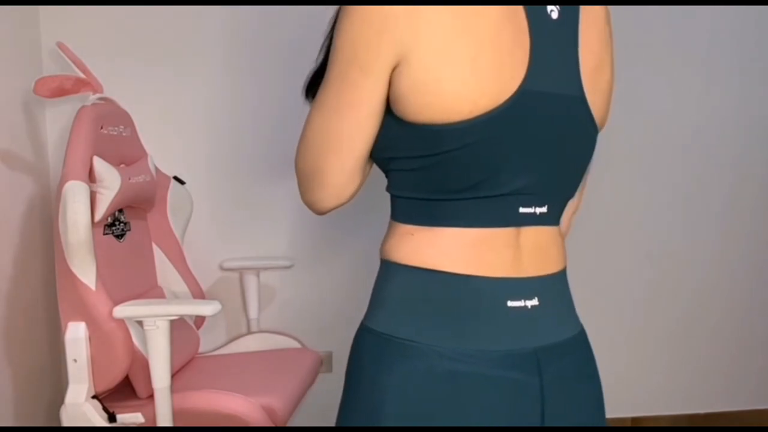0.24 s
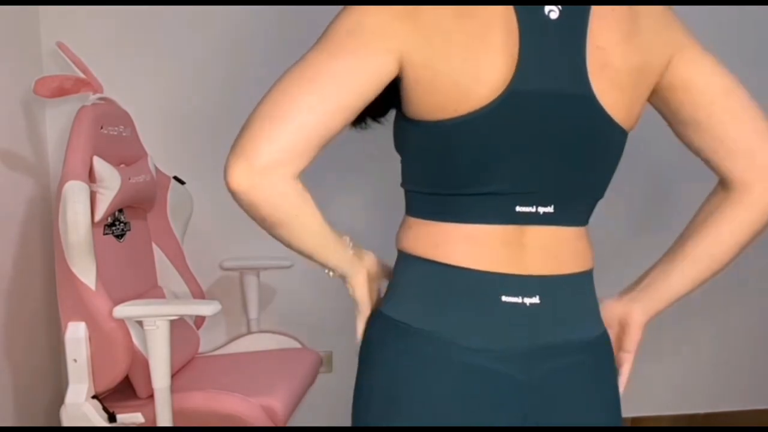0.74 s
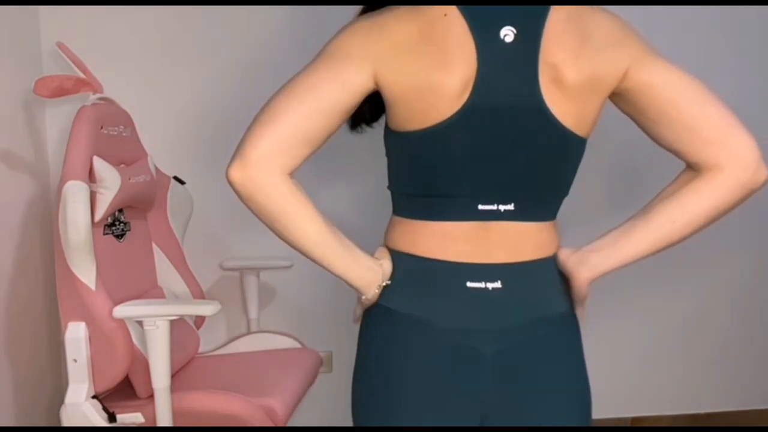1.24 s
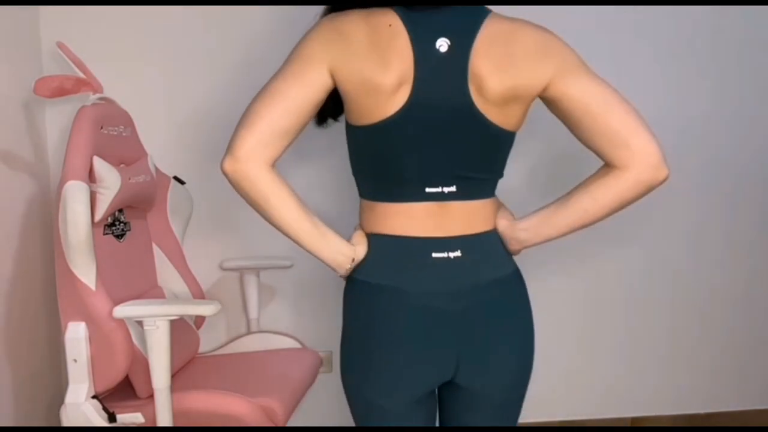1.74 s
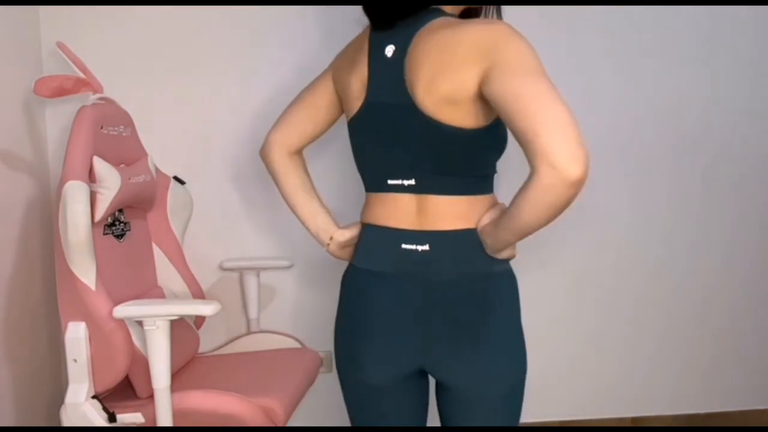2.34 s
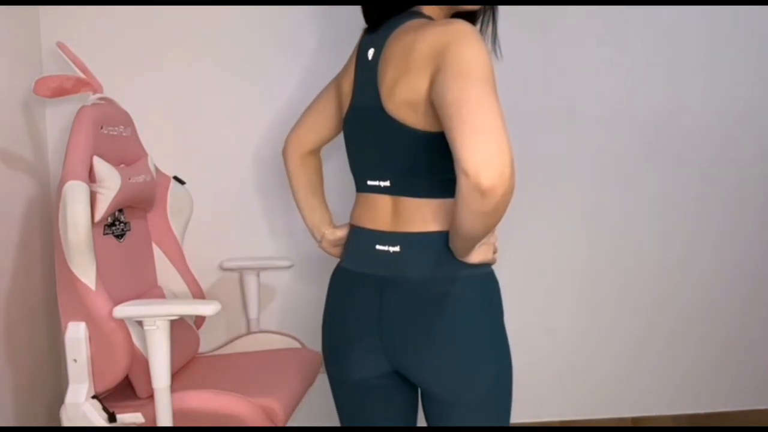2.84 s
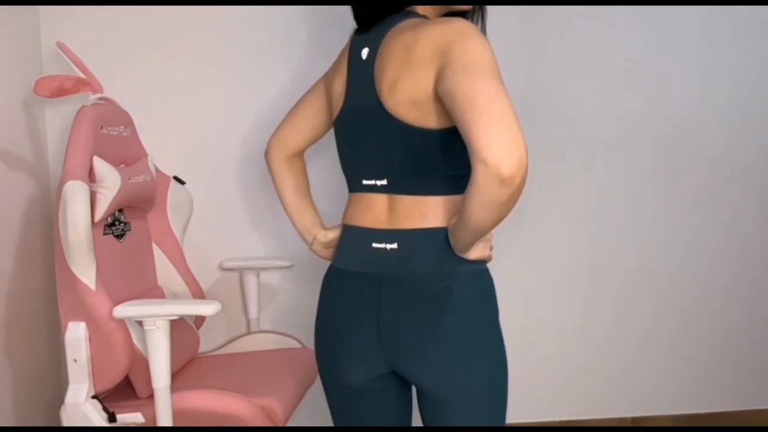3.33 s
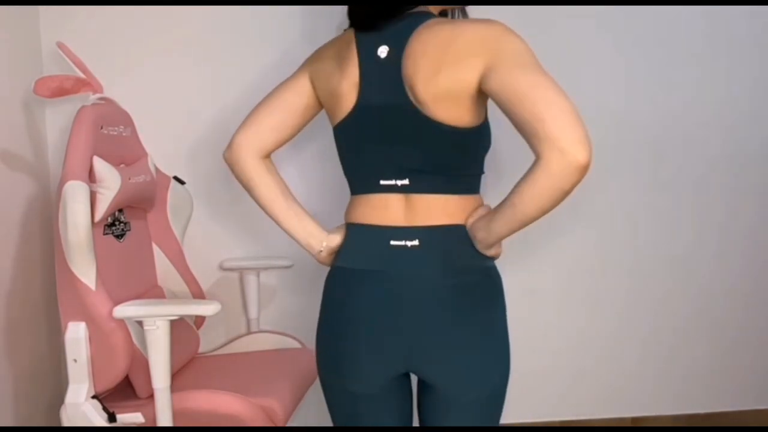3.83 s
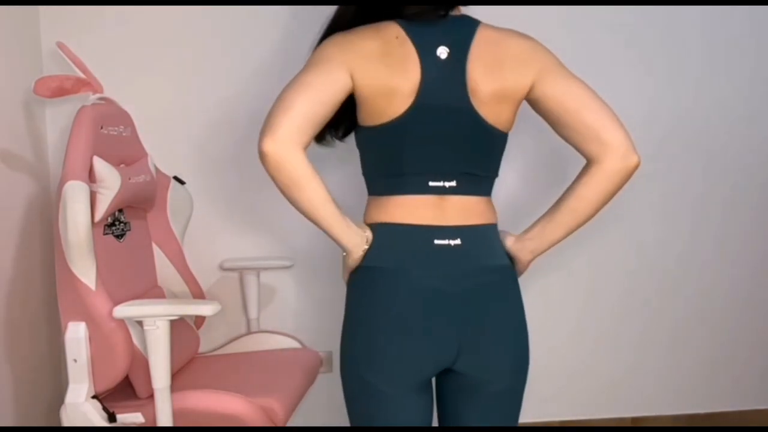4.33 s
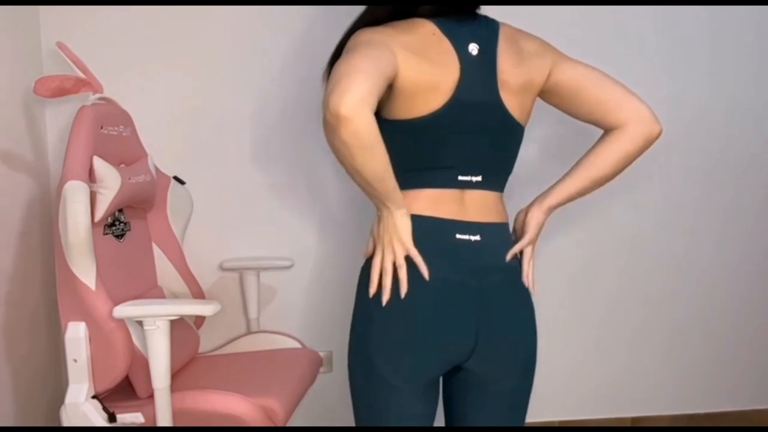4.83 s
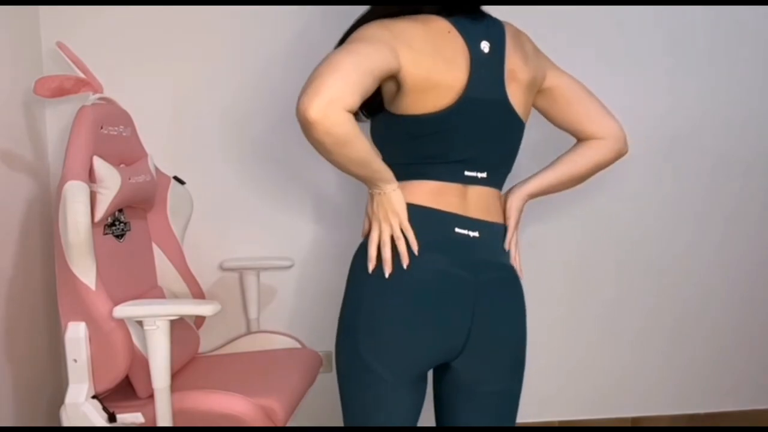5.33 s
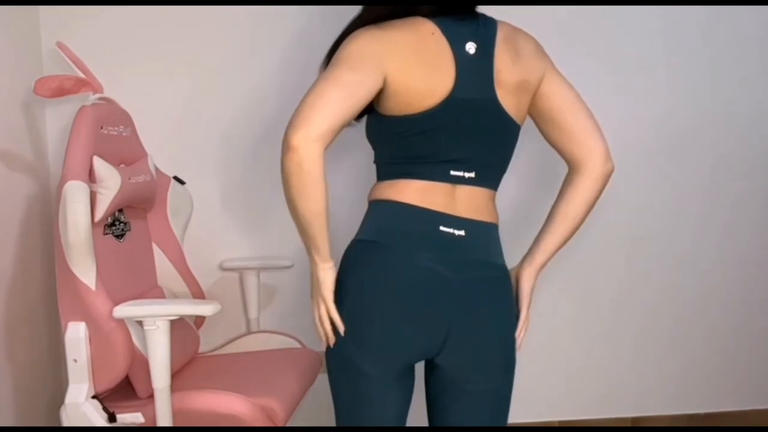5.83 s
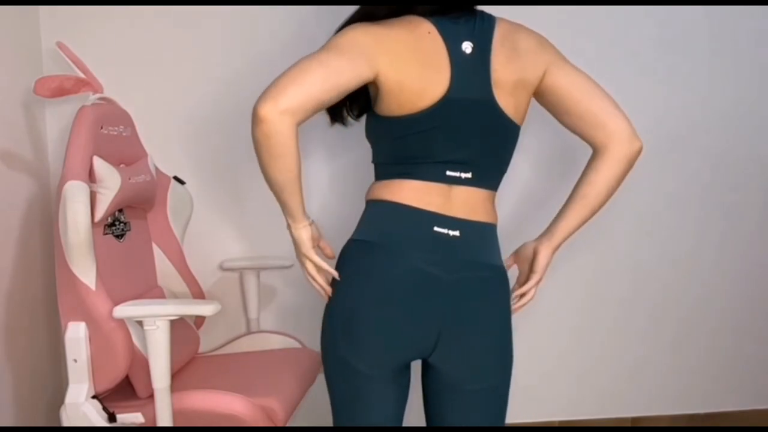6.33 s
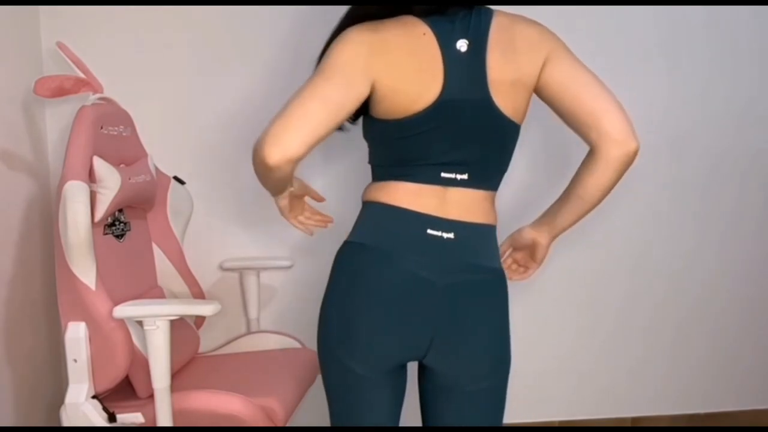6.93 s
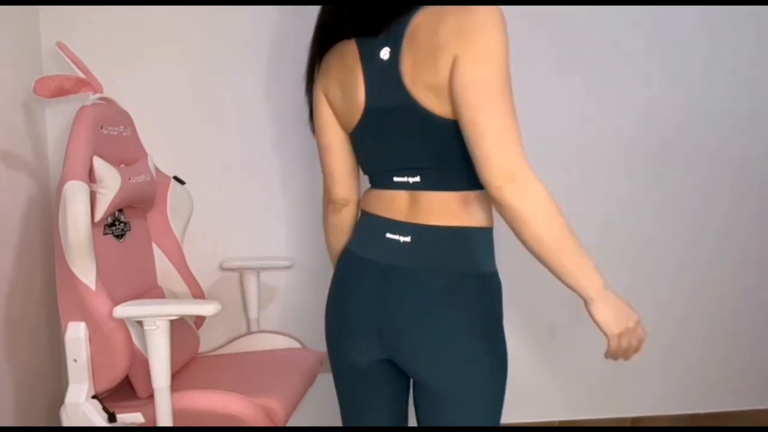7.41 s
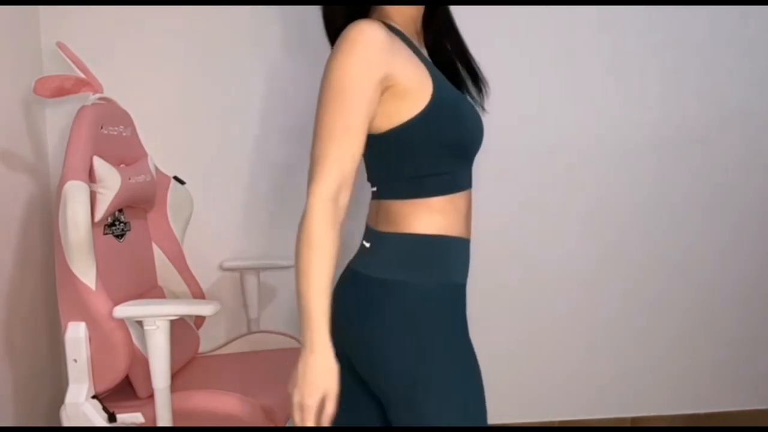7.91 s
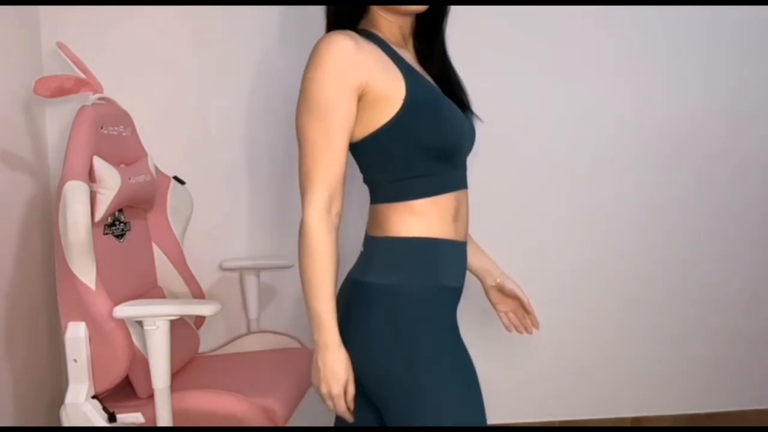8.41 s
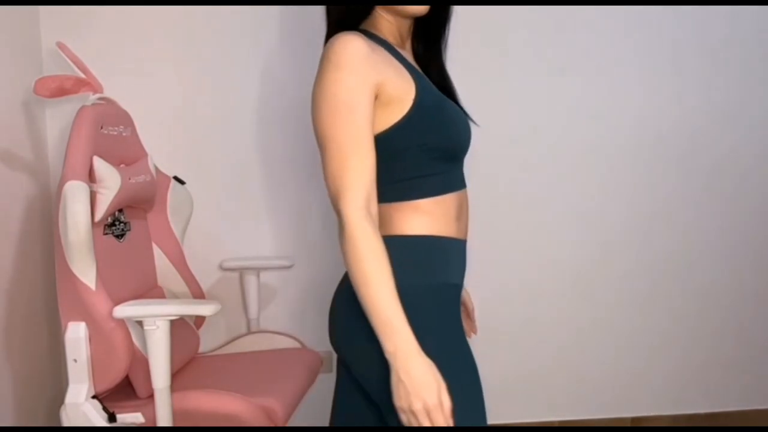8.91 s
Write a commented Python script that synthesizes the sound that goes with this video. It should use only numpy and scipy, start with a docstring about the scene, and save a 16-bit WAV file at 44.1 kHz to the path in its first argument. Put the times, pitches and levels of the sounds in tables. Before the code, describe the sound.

A person shifts and turns in snug sportswear; fabric swishes and scuffs softly while deep bumps jolt a microphone resting on the cloth.

```python
"""Cloth and hands rub with a soft, stuttering hiss of band-passed grains, with swishes, strokes and scuffs.
A person in tight sports clothes shifts and turns in a quiet room, a small microphone resting on the fabric.
At no distance, slips and weight shifts jolt it into thumps, mostly 40-100 Hz: a pull, a swing, a decaying ring.
Pressure spikes give narrow ticks and wider dull knocks, some on top of a jolt; random bumps make a low rumble
carried through the body. Behind lie shuddering tones, grinding low mids, deep sway noise and steady room air."""
import sys
import numpy as np
from scipy import signal
from scipy.fft import rfft, irfft
from scipy.io import wavfile
from scipy.ndimage import uniform_filter1d

SR = 44100
rng = np.random.default_rng(int(sys.argv[2]) if len(sys.argv) > 2 else 0)


def level_to_linear(level):
    """Convert decibel levels to linear amplitude factors, elementwise."""
    exponent = np.asarray(level, float) / 20
    return 10 ** exponent


def output_pcm(signal):
    """Save a mono or channel-first signal as 16-bit PCM at the path in sys.argv[1].

    Samples are clipped to [-1, 1] before scaling.
    """
    pcm = np.clip(np.atleast_2d(signal).T, -1, 1) * 32767
    wavfile.write(sys.argv[1], SR, np.round(pcm).astype(np.int16))


N = 404037   # length in samples, about 9.16 s

# room air and self-noise: f/Hz, density/dB per Hz
ROOM_SPECTRUM = [(20, -60.5), (40, -78), (120, -82), (600, -106), (2000, -110), (8000, -114), (15500, -118)]
# weight shifting, heard as rumble through the body: t/s, low level before a common lift/dB,
# upper rumble relative to the low/dB
WEIGHT_SHIFTS = [(0.0, -73, -3), (0.79, -60, -11.5), (1.25, -51.5, -10), (1.58, -54, 0.5), (1.78, -53, -10),
                 (2.07, -50, -4.5), (2.4, -55, -3), (2.91, -64, 1.5), (3.09, -53.5, -1.5),
                 (3.44, -49.5, -1.5), (3.57, -41.5, -2), (3.85, -58.5, -3.5), (4.44, -53, -3.5),
                 (4.59, -51, -6), (5.23, -47.5, -1.5), (5.54, -52.5, -5), (6.07, -48.5, -4),
                 (6.35, -47.5, -9), (6.53, -48, -15), (6.71, -48.5, -12), (6.97, -56, -2), (7.24, -46, -8),
                 (7.5, -48.5, -6), (7.68, -55, -1), (8.27, -52.5, -8), (8.62, -57, 0), (8.83, -45.5, -8.5),
                 (9.16, -48.5, -5)]
# cloth slipping in quick regular jerks, one list per shudder: t/s, f/Hz, level of the first partial/dB
SHUDDERS = [
    [(4.675, 54, -52), (4.70, 56, -35), (4.73, 88.5, -33), (4.76, 130, -38.5), (4.80, 134, -57)],
    [(6.27, 79, -40), (6.29, 96, -36), (6.315, 69, -38), (6.35, 55, -40)],
    [(6.66, 125, -40), (6.68, 100, -33), (6.70, 83.5, -31.5), (6.735, 64.5, -44)],
    [(7.73, 105, -56), (7.75, 110, -52), (7.77, 107, -41), (7.79, 100, -74)],
]
# jolts of the microphone: t of the end of the pull/s, peak before cushioning/dB, swing/ms,
# starting ring f/Hz, ring t60/s
JOLTS = [(1.058, -31.5, 5.6, 70.0, 0.032), (1.143, -32, 3.3, 90.0, 0.035), (1.4123, -33, 3.9, 38.0, 0.12),
         (2.156, -30, 5.2, 70.0, 0.033), (2.272, -30.5, 4.5, 60.0, 0.027),
         (2.2912, -30.5, 5.1, 95.0, 0.092), (2.4923, -35, 4.6, 85.0, 0.092),
         (2.556, -35.5, 5.7, 60.0, 0.05), (2.7, -37, 2.2, 110, 0.037), (2.768, -35, 4.1, 70, .03),
         (3.273, -28, 5.1, 102.0, 0.054), (3.424, -26.5, 5.8, 60.0, 0.066),
         (3.4621, -24.5, 6.8, 54.0, 0.048), (3.5073, -21.5, 4.6, 38.0, 0.047),
         (3.5332, -20, 3.3, 38.0, 0.076), (3.5798, -25, 3, 48.0, 0.1), (3.627, -28, 7.8, 40.0, 0.087),
         (3.764, -31, 3, 60.0, 0.029), (4.891, -34, 9, 60.0, 0.05), (5.1126, -22, 6.3, 38.0, 0.047),
         (5.1367, -23, 8.7, 50.0, 0.08), (5.1615, -26.5, 7.9, 51.0, 0.16), (5.2965, -31, 6, 43.7, 0.16),
         (6.149, -31, 8, 63.0, 0.22), (6.3706, -18, 0.56, 182, 0.025), (6.376, -25, 3, 110, .034),
         (6.381, -24.5, 7.4, 50, 0.17), (6.516, -24.5, 9.2, 89, 0.041), (6.531, -28.5, 16.5, 38, 0.1),
         (6.8988, -20.5, 9, 60, 0.065), (7.0542, -32, 8.9, 78.0, 0.039), (7.0864, -16.5, 4.9, 42.0, 0.1),
         (7.15, -16, 4.7, 41.5, 0.12), (7.2084, -31, 4.6, 82, 0.054), (7.3018, -17, 4.4, 46.0, 0.082),
         (7.323, -22.5, 10.7, 45.0, 0.038), (7.3596, -23, 3.9, 53.0, 0.22), (7.3693, -15, 0.35, 93, 0.056),
         (8.5976, -34, 10.3, 45.0, 0.12), (8.6638, -23, 9.9, 48.7, 0.044), (8.788, -32, 10, 50.0, 0.045),
         (8.8617, -34.5, 5.9, 70.4, 0.071), (8.881, -37, 7, 60.0, 0.06)]
# resonances of the capsule mount: f/Hz, level/dB, t60/s
MOUNT_MODES = [(513, -5, 0.014), (1500, -1, 0.0024), (2300, 1, 0.0015)]
# narrow ticks, and wider dull knocks, some on top of a jolt: t/s, peak before the mount rings/dB,
# half-width at half height/ms, direction/sign
TAPS = [(1.5824, -39.5, .06, 1), (2.297, -34, 0.37, 1), (3.4622, -29, 0.21, 1), (3.556, -18, 0.92, -1),
        (6.3704, -14, 0.35, 1), (6.3709, -13, 0.36, 1), (6.5215, -20, 0.97, 1), (6.5257, -28.5, 0.096, 1),
        (6.527, -25, 1, 1), (7.3697, -46, .05, 1), (7.153, -26, 0.42, -1), (7.0325, -33, 0.062, -1),
        (7.231, -38, .08, 1), (7.318, -36, .03, 1), (7.3692, -36, 0.23, -1), (6.6635, -46, .1, 1),
        (7.857, -38, 0.21, -1), (7.917, -34.5, 0.46, -1), (7.9502, -40, 0.096, -1), (7.975, -49, 0.18, -1),
        (8.018, -40, 0.074, -1), (8.0508, -30, 0.031, -1), (8.085, -39, 0.11, -1)]
# short scuffs of cloth: t/s, nominal peak/dB, treble relative to the middle before a common lift/dB, centre f/Hz
SCUFFS = [(1.581, -44, -14, 2500), (2.294, -36, -7, 633), (3.333, -36, -11, 2190), (3.457, -31.5, -14, 713),
          (3.53, -29, -22, 560), (5.108, -35, -9, 746), (5.137, -37, -9, 824), (6.523, -43, -9, 1500),
          (6.662, -49, -15, 700), (6.741, -40, -18, 1480), (6.895, -37.5, -4.5, 614), (7.048, -41, -7, 530),
          (7.086, -29.5, -10.5, 501), (7.148, -29, -10.5, 980), (7.202, -38, -8, 1960),
          (7.299, -28, -15, 501), (7.325, -25.5, -17, 829), (7.622, -34, -26, 961),
          (8.664, -31, -10.5, 1500), (8.749, -29, -14, 1500), (8.786, -35.5, -8, 1900),
          (8.82, -35, -8, 2030), (8.852, -42, -2, 1200), (8.877, -39, -4, 703)]
# duller strokes of a palm pressing over the cloth: t/s, rms level at the top/dB, length/ms, centre f/Hz
STROKES = [(0.28, -62.5, 60, 1300), (0.56, -60, 59, 1700), (0.93, -56, 26, 420), (1.17, -55.5, 200, 3540),
           (1.48, -52, 110, 3300), (2.72, -54, 70, 1900), (3.55, -57.5, 110, 600), (4.085, -49, 40, 1860),
           (4.75, -49, 63, 520), (4.89, -48.5, 60, 440), (6.1, -56, 280, 2480), (6.26, -52.5, 70, 2380),
           (7.48, -54.5, 43, 1300)]
# bright swishes of a hand sliding fast: t/s, rms level of the lower band at the top/dB, length/ms
SWISHES = [(0.93, -53, 42), (1.08, -51.5, 23), (1.49, -57, 79), (1.87, -47, 33), (1.96, -46.5, 35),
           (2.045, -49.5, 76), (2.165, -47.5, 52), (3.456, -50, 35), (3.56, -50, 45), (4.25, -49.5, 72),
           (4.45, -48, 49), (4.548, -47, 46), (5.112, -33, 7.6), (5.14, -34, 7), (5.162, -35, 10),
           (5.2, -40.5, 64), (5.3, -46, 90), (5.41, -43, 27), (5.49, -47.5, 65), (5.8, -48.5, 124),
           (6.28, -49, 98), (7.29, -49.5, 41), (7.552, -48, 22), (7.625, -50, 13), (8.15, -48.5, 69),
           (8.244, -55, 25), (8.44, -51, 30), (8.91, -53, 45)]
# bands of cloth noise, all five tables: low f/Hz, high f/Hz, flicker/dB
RUB_BANDS = [(1716, 2170, 1.6), (1890, 2660, 1.2), (2640, 3830, 1.54)]
BRIGHT_BANDS = [(3690, 5550, 1.2), (5910, 8700, 1.3)]
SHEEN_BANDS = [(8040, 16200, 1), (12800, 21500, 0.76)]
DRAG_BANDS = [(177, 400, 1.8), (405, 865, 1.9)]
DULL_BANDS = [(950, 1730, 1)]
# trims, one row per band table in the order above, one entry per band: level/dB
BAND_TRIMS = [
    [-14, -4, -5],
    [-4, -2],
    [2, -2],
    [-4, -4],
    [0.5],
]
# rubbing of cloth and hands: t/s, level before trims and pauses/dB, brightness/dB
RUBBING = [(0.0, -66, 1), (0.66, -64, -1), (1.43, -54.5, 2), (1.71, -60.5, 1), (1.86, -49, -3),
           (1.94, -53, 2), (2.37, -54.5, -3.5), (2.73, -54, -0.5), (2.83, -63, -2.5), (2.88, -56, -3.5),
           (3.54, -51, 0.5), (4.03, -56, -3), (4.08, -49, -3), (4.13, -54.5, -1.5), (4.23, -50.5, 0),
           (4.72, -52, -1), (4.77, -50.5, 0.5), (5.05, -52, 1), (5.2, -49.5, 6.5), (5.25, -53.5, 5),
           (5.31, -48, 3), (5.69, -54.5, 0.5), (6.38, -53, -2.5), (6.48, -65, -3), (6.53, -60, 0),
           (6.55, -78, 5), (6.71, -58.5, -5), (6.86, -62.5, -1.5), (7.32, -60, 2.5), (7.35, -49, -2),
           (7.37, -54.5, 5), (7.4, -55, -1.5), (7.65, -56, -0.5), (7.93, -63, 1), (8.04, -54, -0.5),
           (8.24, -52, 0), (8.54, -58, -1), (8.88, -54.5, -5.5), (9.11, -57, 2.5), (9.16, -70, -4)]
# low drag of cloth: t/s, level before a common lift, trims and pauses/dB
DRAGGING = [(0.0, -67.5), (0.74, -66.5), (1.17, -63), (2.5, -59), (3.03, -61.5), (3.59, -58.5),
            (3.85, -61.5), (4.64, -57.5), (4.97, -53), (6.4, -62), (6.73, -70), (7.09, -66), (7.24, -55.5),
            (8.65, -63.5), (8.85, -58.5), (9.16, -62)]
# extra level of the topmost treble: t/s, level/dB
SHEEN_EXTRA = [(0, 2), (.9, -1.5), (1.7, -0.5), (2, 2), (2.8, 0), (3.5, 3.5), (4.3, -1.5), (4.75, 5),
               (5.05, -1), (6, 1), (6.3, 2.5), (6.6, 3), (7.2, 2), (7.6, -0.5), (8.3, -0.5), (8.8, 4.5),
               (9.16, 2.5)]
# the cloth holds still for a moment: t/s, depth (sign ignored)/dB, length/ms
PAUSES = [(0.6, 6, 37), (0.965, -3, 7.9), (1.005, 16, 8.9), (1.11, 4, 23), (1.6, 3.5, 75), (2.22, 5, 29),
          (2.32, 7, 30), (3.64, 3, 12), (4.59, 2, 36), (4.68, 5.5, 38), (5.126, 5, 12), (5.151, 5, 8),
          (5.35, 5.5, 55), (5.56, 4.5, 40), (5.655, 5.5, 37), (6.95, 2, 60), (7.225, 12, 25),
          (7.345, 10, 14), (7.41, 8.5, 54), (7.52, 4.5, 19), (7.805, 7.5, 35), (7.89, 9, 27),
          (8.405, 3.5, 40), (8.71, 7.5, 78), (8.77, 10, 15), (8.84, 10, 21)]


def in_time(rows):
    """Columns of a curve, interpolated at every sample."""
    s, *columns = np.transpose(rows)
    return [np.interp(np.arange(N) / SR, s, c) for c in columns]


def rms_one(x):
    """Scale to rms 1."""
    return x / np.sqrt(np.mean(x ** 2) + 1e-20)


def band(x, low_hz, high_hz):
    """Band-pass between two corner frequencies."""
    corners = [low_hz, min(high_hz, 0.45 * SR)]
    return signal.sosfilt(signal.butter(2, corners, "band", fs=SR, output="sos"), x)


def drift(rate_hz):
    """Slow random wander of rms 1: low-passed noise made at every 40th sample."""
    pole = np.exp(-80 * np.pi * rate_hz / SR)
    noise = rng.standard_normal(N // 40 + 2002)
    slow = signal.lfilter([1], [1, -2 * pole, pole * pole], noise)[2000:]   # skip the filter's start
    return np.interp(np.arange(N) / 40, np.arange(len(slow)), rms_one(slow))


def add(out, s, shape):
    """Mix a short sound in at time s."""
    i = round(s * SR)
    out[i:i + len(shape)] += shape[:N - i]


def bells(rows, gain):
    """Sum of bell-shaped swells at (t/s, size, length/ms)."""
    out = np.zeros(N)
    for s, size, ms in rows:
        t_ms = np.arange(-1.5 * ms, 1.5 * ms, 1000 / SR)
        add(out, s + t_ms[0] / 1000, gain(size) * np.exp(-(2 * t_ms / ms) ** 2))
    return out


def room():
    """Steady air and self-noise: white noise shaped per Hz."""
    hz = np.maximum(np.fft.rfftfreq(N, 1 / SR), 10)
    points = np.array(ROOM_SPECTRUM)
    density_db = np.interp(np.log(hz), np.log(points[:, 0]), points[:, 1])
    colour = level_to_linear(density_db) * np.sqrt(SR / 2)
    return irfft(rfft(rng.standard_normal(N)) * colour, N)


def sway():
    """The body sways: deep noise of wandering level, below most of the thumps."""
    noise = rng.standard_normal(N)
    return level_to_linear(-55 + 3.8 * drift(2.8)) * rms_one(band(noise, 16, 38))


def rumble(low_db, upper_db):
    """Many tiny jolts shake the capsule: lumpy low noise, each bump soft."""
    sizes = level_to_linear(4.0 * np.minimum(rng.exponential(1, N), 4)) * rng.choice([-1, 1], N)
    bumps = sizes * (rng.random(N) < 120 / SR) + 1e-18   # about 120 per second
    low = rms_one(band(band(bumps, 32, 78.5), 36.4, 82.5))
    upper = rms_one(band(band(bumps, 49.5, 155), 64.4, 273))
    return level_to_linear(low_db) * low + level_to_linear(upper_db) * upper


def shudders():
    """Regular jerks give a gliding low tone with a weak second partial."""
    out = np.zeros(N)
    for rows in SHUDDERS:
        s, hz, level_db = np.transpose(rows)
        t = np.arange(s[0], s[-1], 1 / SR)
        phase = 2 * np.pi * np.cumsum(np.interp(t, s, hz)) / SR
        fade = signal.windows.tukey(len(t), 0.2)
        tone = np.sin(phase) + level_to_linear(-16.5) * np.sin(2 * phase)
        level = np.sqrt(2) * level_to_linear(np.interp(t, s, level_db))   # rms to peak
        add(out, s[0], fade * level * tone)
    return out


def jolts():
    """A pull inwards, a quick swing out, then the capsule rings down on the cloth."""
    pull = 0.48   # share of the peak
    rest_hz, settle_s = 42, 0.0061   # the ring slides to the capsule's resting bounce
    out, t = np.zeros(N), np.arange(-0.012, 0.16, 1 / SR)
    for s, peak_db, swing_ms, hz, t60 in JOLTS:
        swing = swing_ms / 1000
        since = np.maximum(t - swing, 0)
        slide = (hz - rest_hz) * settle_s * (1 - np.exp(-since / settle_s))
        cycles = rest_hz * since + slide
        before = -pull * np.exp(-(t / (0.00032 + 0.39 * swing)) ** 2)
        during = -pull + (1 + pull) * np.sin(np.pi / 2 * t / swing) ** 2
        after = np.cos(2 * np.pi * cycles) * level_to_linear(-60 * since / t60)
        shape = np.select([t < 0, t < swing], [before, during], after)
        add(out, s + t[0], level_to_linear(peak_db) * shape)
    return out


def mount(x):
    """Sharp shocks also ring the short modes of the capsule mount; the direct sound stays."""
    out = x
    for hz, mode_db, t60 in MOUNT_MODES:
        r, w = level_to_linear(-60 / (t60 * SR)), 2 * np.pi * hz / SR
        top = level_to_linear(mode_db) * (1 - r * r) / 2
        out = out + signal.lfilter([top, 0, -top], [1, -2 * r * np.cos(w), r * r], x + 1e-18)
    return out


def grind(motion):
    """The faster the capsule moves against the cloth, the more it grinds, most in the low mids."""
    slope = np.gradient(band(motion, 15, 300)) * SR / 300
    speed = uniform_filter1d(np.abs(slope), size=90)
    grit = rng.standard_normal((2, N))
    lower = level_to_linear(-27.0) * rms_one(band(grit[0], 186, 560))
    upper = level_to_linear(-30.5) * rms_one(band(grit[1], 720, 2300))
    return speed * (lower + upper)


def taps():
    """Each tap is one spike of pressure: narrow ones tick, wider ones knock dully, some on top of a jolt."""
    out, t = np.zeros(N), np.arange(-0.006, 0.006, 1 / SR)
    for s, peak_db, width_ms, direction in TAPS:
        spike = 1 / (1 + (t * 1000 / width_ms) ** 2)
        add(out, s + t[0], np.sign(direction) * level_to_linear(peak_db) * spike)
    return out


def scuffs():
    """Puffs of rubbing noise a few ms long: a wide band around the centre, and treble."""
    out, t = np.zeros(N), np.arange(0, 0.04, 1 / SR)
    white = rng.standard_normal((len(SCUFFS), 2, len(t)))
    x = t / 0.00275   # each puff is strongest after 2.75 ms
    for (s, peak_db, treble_db, hz), (a, b) in zip(SCUFFS, white):
        puff = level_to_linear(peak_db - 11) * x * np.exp((1 - x * x) / 2)   # noise peaks taken as 11 dB over rms
        middle = rms_one(band(a, hz / 2.5, hz * 1.84))
        treble = level_to_linear(treble_db + 7.0) * rms_one(band(b, 2400, 14700))
        add(out, s, puff * (middle + treble))
    return out


def strokes():
    """A palm presses over the cloth: grainy swells, each in a band of its own."""
    edge_ratio = 1.34   # band edges relative to the centre
    out, t = np.zeros(N), np.arange(-0.2, 0.2, 1 / SR)
    grains = rng.standard_normal((len(STROKES), len(t))) * level_to_linear(3.46 * rng.exponential(1, len(t)))
    for (s, level_db, ms, hz), g in zip(STROKES, grains):
        swell = level_to_linear(level_db) * np.exp(-(2000 * t / ms) ** 2)
        add(out, s + t[0], swell * rms_one(band(g, hz / edge_ratio, hz * edge_ratio)))
    return out


def swishes():
    """A hand slides fast: swells of bright hiss in two bands."""
    hiss = rng.standard_normal((2, N))
    bright = rms_one(band(hiss[0], 3750, 9200))
    sheen = level_to_linear(-7.5) * rms_one(band(hiss[1], 6000, 23000))
    return bells(SWISHES, level_to_linear) * (bright + sheen)


def cloth(rub_db, bright_db, sheen_db, drag_db, dull_db):
    """Fibres catch in dense grains; all bands stutter together as the cloth sticks and slips."""
    stutter_db = 0.81 * drift(18) + 1.2 * drift(72)
    parts = [RUB_BANDS, BRIGHT_BANDS, SHEEN_BANDS, DRAG_BANDS, DULL_BANDS]
    levels = [rub_db, rub_db + bright_db, rub_db + sheen_db, drag_db, dull_db]
    out = 0
    for part, trims, level_db in zip(parts, BAND_TRIMS, levels):
        for (low_hz, high_hz, flicker_db), trim_db in zip(part, trims):
            fibres = rng.standard_normal(N) * level_to_linear(2.0 * rng.exponential(1, N))
            gain_db = level_db + trim_db + stutter_db + flicker_db * drift(12.4)
            out = out + level_to_linear(gain_db) * rms_one(band(fibres, low_hz, high_hz))
    return out


def scene():
    """All sounds reach the one capsule on the fabric."""
    weight_db, upper_db = in_time(WEIGHT_SHIFTS)
    low_db = weight_db + 2.5 + 1.5 * drift(6.4)   # common lift, random swell
    soft = signal.sosfilt(signal.butter(4, 2600, fs=SR, output="sos"), jolts())   # cloth cushions the blows
    motion = rumble(low_db, low_db + upper_db) + mount(soft) + shudders()

    rub_db, bright_db = in_time(RUBBING)
    pause_db = bells(PAUSES, np.abs)
    rub_db = rub_db - pause_db
    sheen_db = -9.5 + in_time(SHEEN_EXTRA)[0] + 0.29 * bright_db   # relative to the rub
    drag_db = in_time(DRAGGING)[0] + 1.5 - 0.9 * pause_db
    dull_db = -61.5 + rub_db - rub_db.mean()   # follows the rub around a level of its own
    rubbing = cloth(rub_db, bright_db, sheen_db, drag_db, dull_db) + scuffs() + swishes() + strokes()
    mix = motion + grind(motion) + rubbing + mount(taps()) + sway() + room()
    return mix[None]   # one channel


def roll_off(x):
    """The treble ends steeply here."""
    return signal.sosfilt(signal.butter(12, 16650, fs=SR, output="sos"), x)


def record(dry):
    """The microphone drops the deepest bass and the very top."""
    cut = signal.sosfilt(signal.butter(1, 14, "high", fs=SR, output="sos"), dry)
    cut = signal.sosfilt(signal.cheby2(12, 40, 15900, fs=SR, output="sos"), cut)
    return roll_off(cut)


dry = scene()
out = record(dry)
output_pcm(out)
```